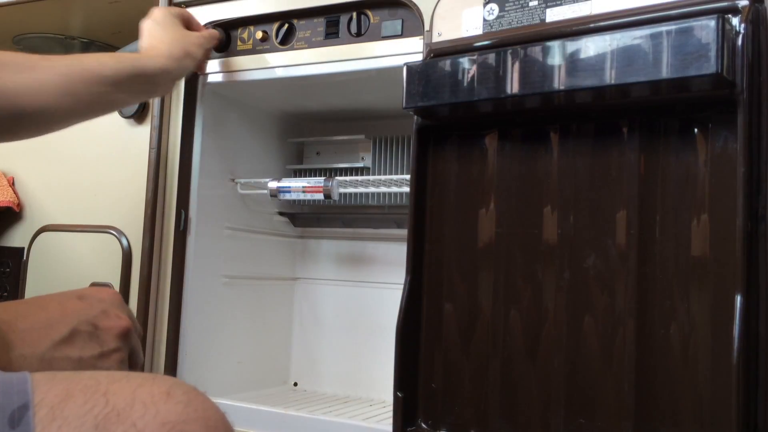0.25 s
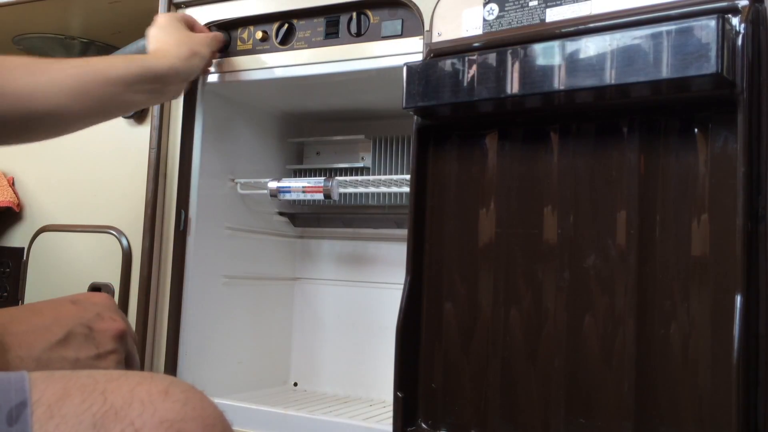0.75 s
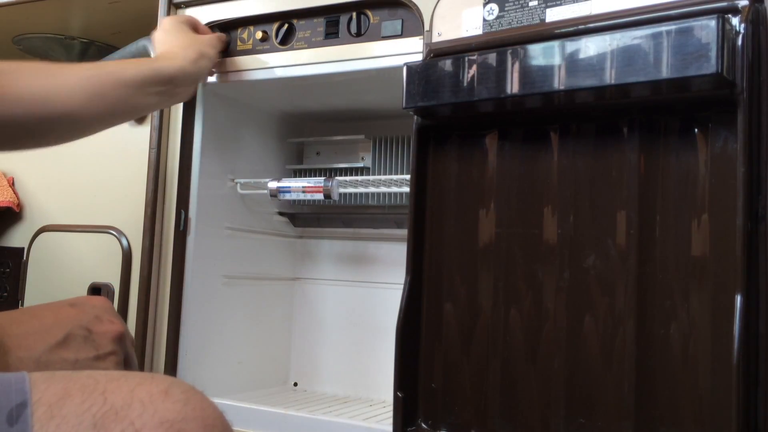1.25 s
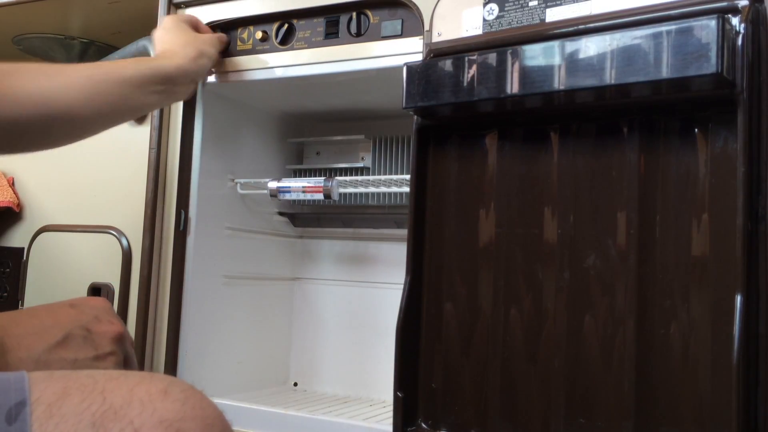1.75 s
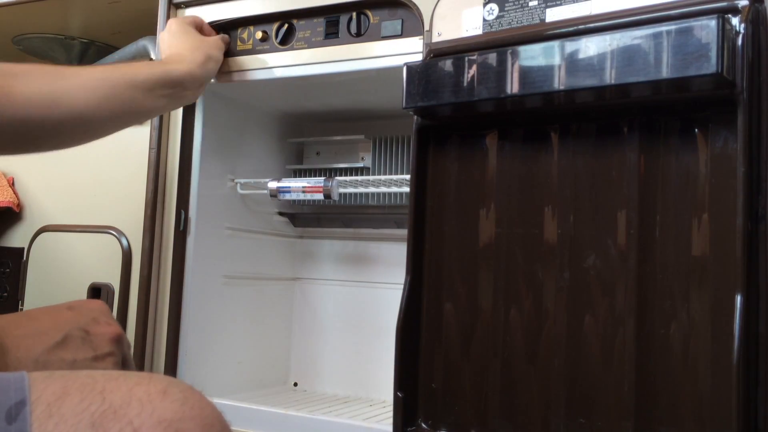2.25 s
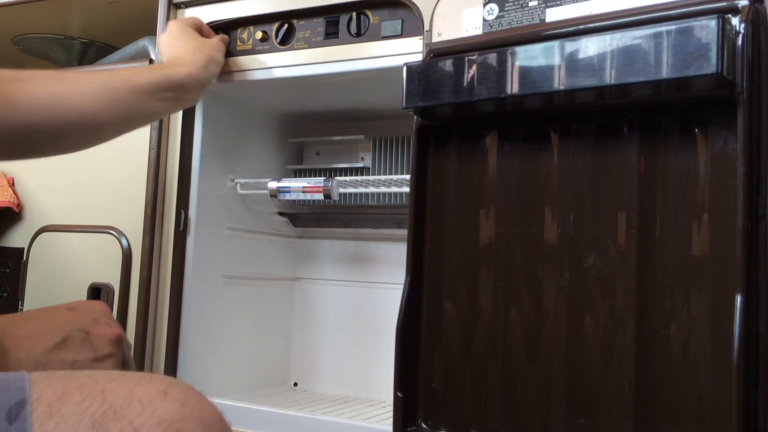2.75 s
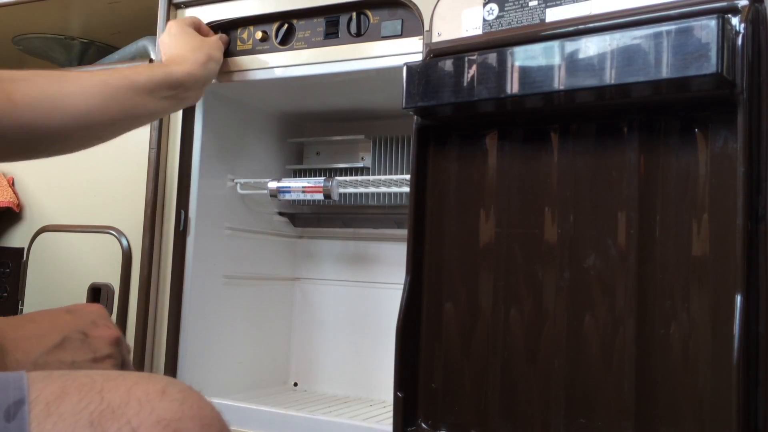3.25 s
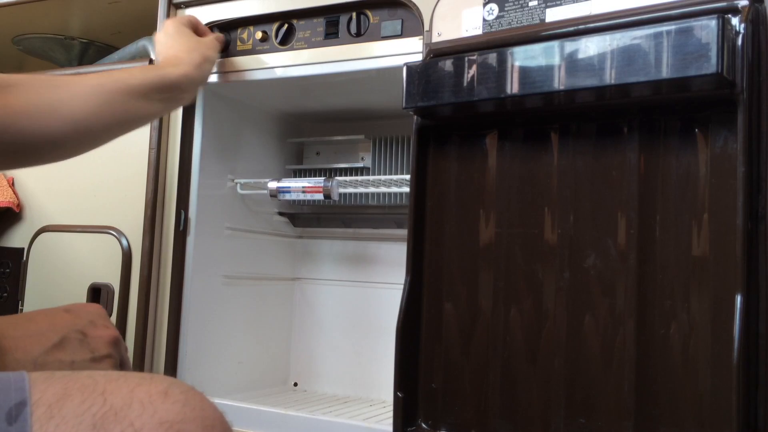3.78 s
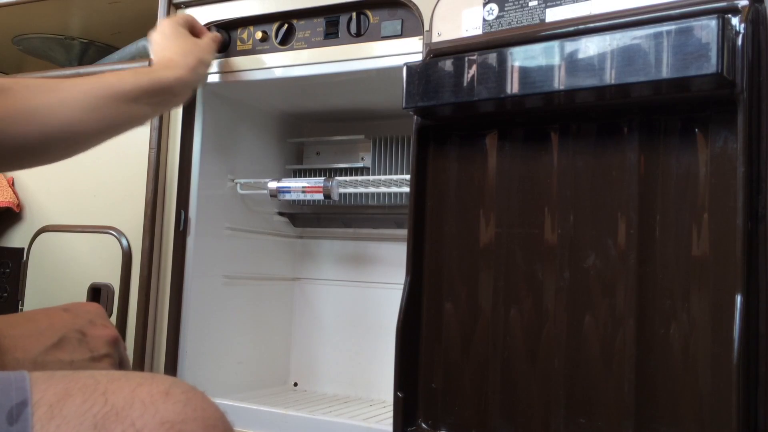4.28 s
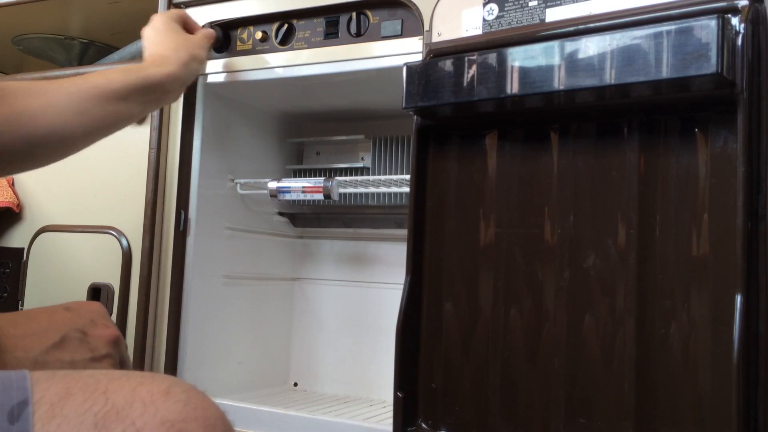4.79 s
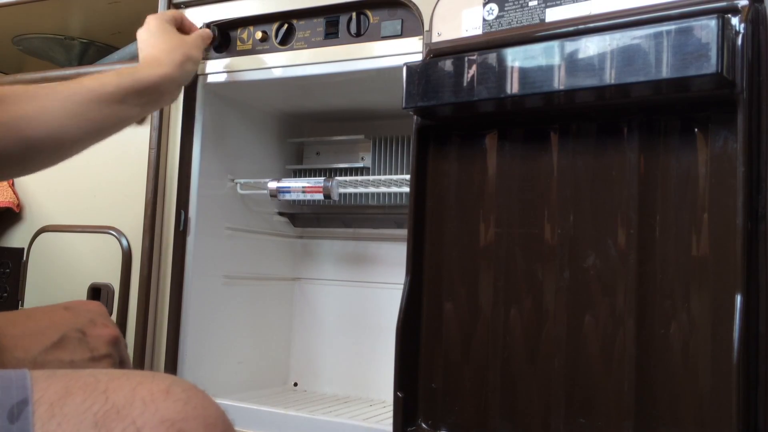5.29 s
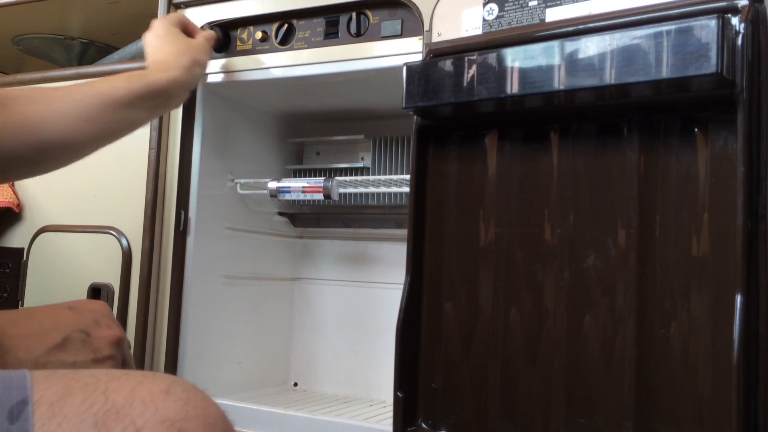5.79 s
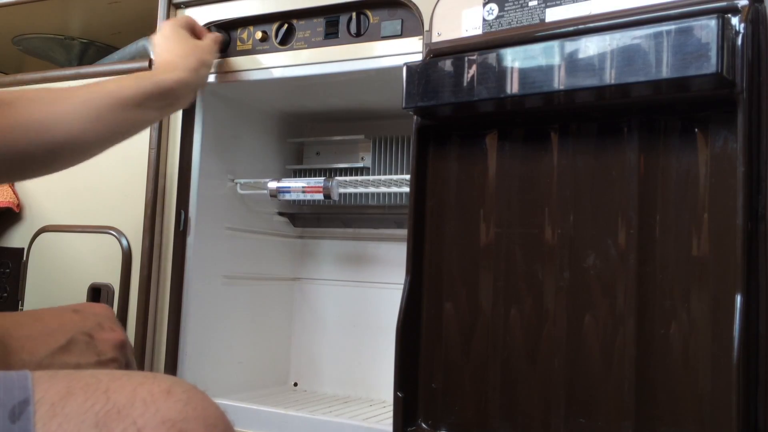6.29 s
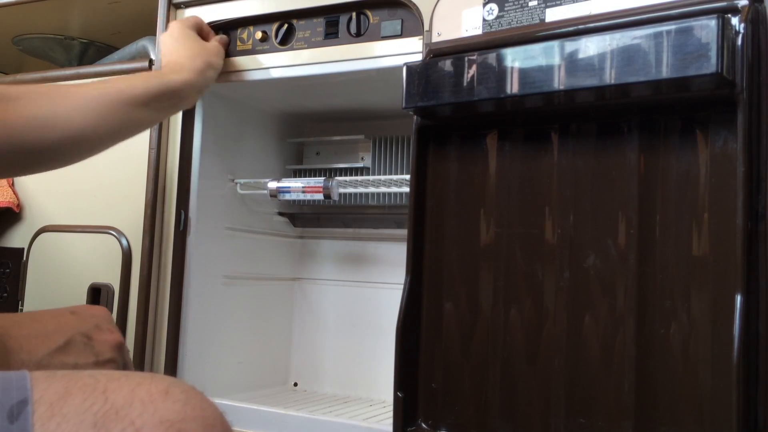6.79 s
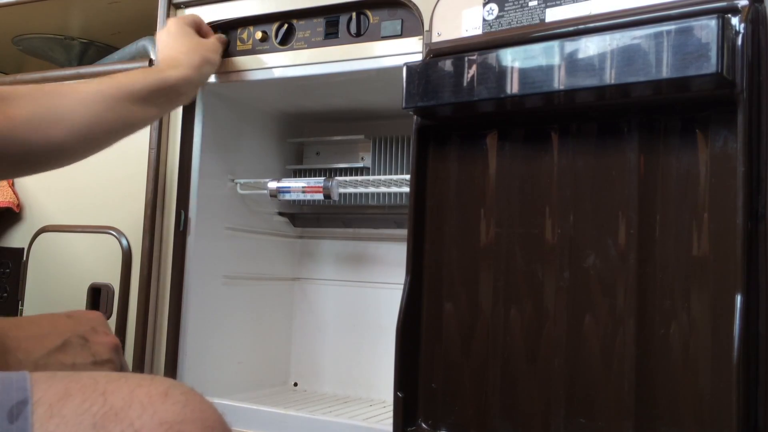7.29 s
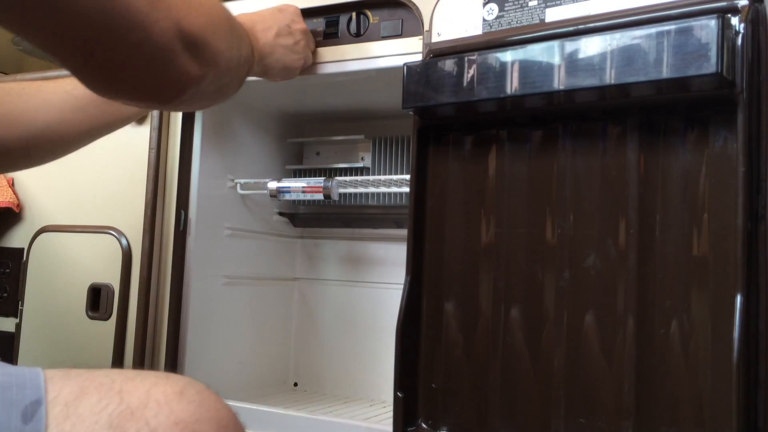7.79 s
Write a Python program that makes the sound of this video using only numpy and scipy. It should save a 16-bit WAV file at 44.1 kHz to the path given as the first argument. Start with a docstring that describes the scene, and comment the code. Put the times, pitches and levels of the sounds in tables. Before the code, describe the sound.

A close, dry perspective in a small camper van, beside an open, empty gas fridge. A quiet low rumble runs throughout, and a short hum swells and dies in the first half second while a half-hearted button press groans softly. From about 0.4 s the piezo igniter is pushed firmly about four times a second, slightly unevenly, until about 7.6 s. Each cycle is a short rising squeak of sliding plastic, a tiny catch click, a loud sharp snap with a hollow, boxy cabinet boom, then a weaker rattling clatter under a tenth of a second later. The squeaks are fainter in the first and last pushes. Small stop taps fall between some snaps; a hard, bright clack rings at 2.9 s, and dull hand knocks come near 3.3, 5.9, 6.2 and 6.6 s. After the last snap, only light finger clicks around 7.8-8 s remain over the faint rumble.

```python
"""From the start a low rumble fills a camper van, and a short hum swells and dies: shaped noise and sines. The
button of the gas fridge's piezo igniter taps its stop at times: noise washes plus damped modes. A first half-
hearted push groans; then, about four times a second with the valve held in, each push squeals by sliding
friction, the catch trips, the hammer snaps, the cabinet booms and the button rattles back. At times the button
knocks dull as it bottoms out just before a snap. Clicks and creaks sound on the control panel, and one hard
clack rings there, as decaying modes."""
import sys
import numpy as np
from scipy import signal
from scipy.fft import rfft, irfft, next_fast_len
from scipy.io import wavfile
from scipy.ndimage import uniform_filter1d, minimum_filter1d, map_coordinates

SR = 44100
rng = np.random.default_rng(int(sys.argv[2]) if len(sys.argv) > 2 else 0)


def wav_out(sig):
    """Save sig, one row per channel (or a flat mono array), as 16-bit PCM at SR to the path in sys.argv[1]."""
    wavfile.write(sys.argv[1], SR, np.round(np.clip(np.atleast_2d(sig).T, -1, 1) * 32767).astype(np.int16))


N = 354475
TIME = np.arange(N) / SR
RING = np.arange(SR // 4) / SR  # time since a blow (s)


def amp(db):
    """Logarithmic level: 20 dB is a factor of ten in amplitude."""
    return 10 ** (np.asarray(db) / 20)


def unit(x):
    """Root-mean-square normalisation: scale to rms 1."""
    return x / np.sqrt(np.mean(x ** 2) + 1e-20)


def along(hz, points_hz, values):
    """Log-frequency interpolation: straight lines between points on a logarithmic axis."""
    return np.interp(np.log(hz + 1), np.log(points_hz), values)


def wobble(rate, size):
    """Slow random modulation: a smooth curve through random knots, rate of them a second."""
    knots = rng.standard_normal(int(size * rate / SR) + 4)
    return map_coordinates(knots, [np.arange(size) * rate / SR])


def filtered(x, gain):
    """Linear filtering: multiply the spectrum by a gain that depends on frequency."""
    m = next_fast_len(len(x) + 2048)
    spectrum = rfft(x, m) * gain(np.fft.rfftfreq(m, 1 / SR))
    return irfft(spectrum, m)[..., :len(x)]


def add(track, s, sound):
    """Superposition: mix a sound into the track at s seconds."""
    start = max(round(s * SR), 0)
    track[start:start + len(sound)] += sound[:max(len(track) - start, 0)]


# modes of the fridge cabinet, excited by every blow: f/Hz, level/dB relative to the blow's colour, t60/s
CABINET_MODES = [(150.4, -21, 0.31), (268.3, -14, 0.17), (300.8, -10.5, 0.14), (326.3, -19, 0.21),
                 (461, -11, 0.12), (526.7, -11, 0.084), (630, -21.5, 0.18), (707, -18, 0.17),
                 (906, -13.5, 0.11), (1327, -18, 0.085), (1603, -16, 0.12), (2040, -18.5, 0.14),
                 (2574, -15.5, 0.1), (2699, -6, 0.045), (3454, -12.5, 0.079)]


def blows(events, colour, own_modes, modes_db, swell_cycles, ragged_db, alike, attack=0.00079):
    """Impact excitation: a diffuse wash plus damped modes; events give t/s, crack level/dB, thud level/dB."""
    band_hz, band_db, band_t60 = np.transpose(colour)
    mode_hz, mode_db, mode_t60 = np.transpose(CABINET_MODES + own_modes)
    hz, t60 = np.r_[band_hz, mode_hz], np.r_[band_t60, mode_t60]
    db = np.r_[band_db, modes_db + mode_db + along(mode_hz, band_hz, band_db)]

    # the cabinet takes a few cycles to get moving, so the bass blooms after the crack
    swell = 1 - np.exp(-(RING * hz[:, None] / swell_cycles) ** 2)
    onset = 1 - np.exp(-RING / attack)
    decay = np.exp(-np.log(1000) * RING / t60[:, None])
    shape = swell * onset * amp(db[:, None]) * decay

    def bands(f):
        """Filter bank: overlapping triangles on a log axis, rolled off below 60 Hz."""
        triangles = [along(f, band_hz, row) for row in np.eye(len(band_hz))]
        return np.array(triangles) * f ** 2 / (f ** 2 + 60 ** 2)

    # every blow takes the same paths through the van, so the share "alike" of the wash power repeats
    paths = rng.standard_normal(len(RING))
    phase = rng.uniform(0, 2 * np.pi, (len(mode_hz), 1))
    track = np.zeros(N)
    for s, crack_db, thud_db in events:
        fresh = rng.standard_normal(len(RING))
        wash = filtered(np.sqrt(alike) * paths + np.sqrt(1 - alike) * fresh, bands)
        wash = wash * amp(ragged_db * wobble(352, len(RING)))  # reflections arrive in clumps
        # loose parts shift a little at each blow and chatter, which roughens the high modes
        detune = 1 + .006 * rng.standard_normal(len(mode_hz))
        chatter = 1.8e-5 * wobble(450, len(RING))  # s
        ring = np.sin(2 * np.pi * (mode_hz * detune)[:, None] * (RING + chatter) + phase)
        # the thud level rules below 800 Hz, the crack level above 1700 Hz
        force_db = along(hz, [800, 1700], [thud_db, crack_db]) + rng.normal(0, 1.67, len(hz))
        add(track, s, amp(force_db) @ (shape * np.vstack([wash, ring])))
    return track


# course of the low hum: t/s, f/Hz, level/dB before its trim
HUM_COURSE = [(0, 111.6, -33.5), (.08, 105, -51.5), (.24, 112, -46), (.31, 117, -39.5), (.39, 115.3, -41),
              (.48, 116, -55)]
# spectral shape of the steady background: f/Hz, level/dB per Hz before normalisation
FLOOR_SPECTRUM = [(15, -50), (25, 7), (101, 8), (204, 0.5), (289, 9), (378, -9.5), (457, 0), (804, -6),
                  (1570, -12.5), (2230, -23.5), (2700, -16.5), (4260, -28), (5140, -35.5), (15500, -47.5)]
RUMBLE_DB, RUMBLE_FALL_DB_PER_S = -48.5, 0.52  # starting level; the rumble slowly settles


def van():
    """Filtered noise and tones: low rumble and a faint broad floor; a hum swells and dies at the start."""
    floor = filtered(rng.standard_normal(N), lambda f: amp(along(f, *np.transpose(FLOOR_SPECTRUM))))
    floor_db = -56.0 + 3.5 * wobble(5.1, N)

    rumble_hz = [35, 75, 105, 128, 152, 200, 400]
    rumble_shape_db = [-11.5, -4, 3.5, -6, -3.5, -27.5, -45.5]
    rumble = filtered(rng.standard_normal(N), lambda f: amp(along(f, rumble_hz, rumble_shape_db)))
    rumble_db = RUMBLE_DB - RUMBLE_FALL_DB_PER_S * TIME + 2.0 * wobble(4.5, N)

    s, hz, db = np.transpose(HUM_COURSE)
    low_phase = 2 * np.pi * np.cumsum(np.interp(TIME, s, hz)) / SR
    low = np.sin(low_phase) * amp(np.interp(TIME, s, db))
    high = np.sin(2 * np.pi * 186 * TIME + 0.59 * wobble(13.0, N))
    high = high * amp(np.interp(TIME, [0, .25, .48], [-48, -51, -66]))
    hum = amp(2.0) * (low + high) * (TIME < s[-1])
    return amp(floor_db) * unit(floor) + amp(rumble_db) * unit(rumble) + hum


# pushes of the igniter button, shared by all its parts:
# snap t/s, strength level/dB before trims, squeal pitch approached f/Hz, delay until the button is back t/s
PUSHES = [(0.3971, -25.5, 5380, .069), (0.629, -21, 6000, 0.084), (0.8702, -20.5, 5550, 0.082),
          (1.108, -20, 6260, 0.093), (1.3584, -21.5, 6130, 0.088), (1.6053, -20.5, 6020, 0.092),
          (1.8541, -21, 6070, 0.085), (2.0926, -19, 6660, .093), (2.3359, -19, 6970, .092),
          (2.5873, -20.5, 6580, 0.096), (2.8424, -19.5, 6180, 0.1), (3.0815, -21, 5970, 0.094),
          (3.339, -23.5, 5650, 0.075), (3.5658, -21, 5700, 0.088), (3.8143, -21.5, 5800, .085),
          (4.0526, -23.5, 6000, 0.085), (4.2882, -19, 6990, 0.094), (4.5429, -21.5, 6000, 0.071),
          (4.7669, -20, 6610, 0.09), (5.007, -20, 5950, 0.085), (5.235, -21, 5820, .083),
          (5.4731, -21, 6600, 0.082), (5.701, -20, 6500, .09), (5.953, -23.5, 5680, 0.067),
          (6.1864, -23, 6050, 0.07), (6.413, -21, 6470, 0.08), (6.6567, -23, 6010, 0.072),
          (6.8799, -20, 6360, 0.086), (7.0993, -20, 6500, 0.1), (7.3466, -23, 5850, 0.079),
          (7.5502, -21.5, 5400, .098)]
# the button taps its outer stop: t/s, level/dB
STOP_TAPS = [(0.0014, -32), (0.2767, -35.5), (1.498, -31), (1.7526, -34.5), (2.245, -35.5), (2.4745, -25),
             (2.7401, -41), (3.2251, -25.5), (4.449, -34.5), (5.3728, -30), (5.849, -36), (6.0824, -43),
             (6.319, -33.5), (6.557, -38.5)]
# colour and decay of the button's return, then of a tap: f/Hz, level/dB per Hz, t60/s
RETURN_COLOUR = [(120, 15.5, 0.11), (321, 18.5, 0.044), (430, 9.5, 0.045), (1010, 4.5, .13),
                 (1480, 5.5, 0.054), (3080, 0, 0.071), (4200, -9, 0.092), (7200, -12.5, 0.063),
                 (14800, -5.5, 0.032)]
TAP_COLOUR = [(90, 22, 0.28), (272, 20.5, 0.16), (433, 10.5, 0.15), (1000, 10, 0.11), (2400, 2, 0.065),
              (4360, -19.5, 0.11), (6500, -5.5, 0.08), (10500, -14.5, 0.093), (15000, -42, .08)]
# modes of the spring: f/Hz, level/dB relative to the tap's colour, t60/s
SPRING_MODES = [(7050, -2, 0.07), (10190, -5, 0.06)]
RETURN_DB, RETURN_THUD_DB, RETURN_SCATTER_DB = -30.5, -5.5, .5  # level before trims, thud against it, spread
RETURN_FOLLOWS = 0.59  # dB of return per dB of push
TAP_THUD_DB = -4  # against the tap's crack


def button():
    """Repeated impact: the button rattles back in three contacts, harder after a hard push, or taps its stop."""
    alike = .25
    snap_s, push_db, _, back_s = np.transpose(PUSHES)
    s = snap_s + back_s
    db = RETURN_DB + RETURN_FOLLOWS * (push_db - push_db.mean())
    db = db + RETURN_SCATTER_DB * rng.standard_normal(len(s))
    thud_db = db + RETURN_THUD_DB
    gaps_s = rng.uniform([.007, .016], [.015, .025], (len(s), 2))
    release = zip(s, db + 0.5, thud_db - 7)
    landing = zip(s + gaps_s[:, 0], db - 5, thud_db - 3.0)
    bounce = zip(s + gaps_s[:, 1], db - 7, thud_db - 11)
    rattle = blows([*release, *landing, *bounce], RETURN_COLOUR, [], modes_db=-3.0,
                   swell_cycles=0.79, ragged_db=2.4, alike=alike, attack=0.0018)
    stops = [(s, db, db + TAP_THUD_DB) for s, db in STOP_TAPS]
    taps = blows(stops, TAP_COLOUR, SPRING_MODES, modes_db=-3.5,
                 swell_cycles=2.8, ragged_db=3, alike=alike)
    return amp(-2) * rattle + taps


def squeal(pitch_hz, whistle_db, groan_db):
    """Stick-slip friction: sliding plastic whistles unsteadily over a groan about five times lower, and rubs."""
    size = len(pitch_hz)
    phase = 2 * np.pi * np.cumsum(pitch_hz * (1 + .039 * wobble(1100, size))) / SR
    whistle = np.sin(phase) * amp(whistle_db + 3.5 * wobble(260, size))
    groan = np.sin(.21 * phase) * amp(groan_db)
    rub_hz, rub_db = [300, 1100, 2200, 6000, 14000], [-3.0, 13.0, -1.5, -6, -24]
    rub = unit(filtered(rng.standard_normal(size), lambda f: amp(along(f, rub_hz, rub_db))))
    return whistle + groan + amp(-5.5) * rub * amp(np.maximum(whistle_db, groan_db))


# the groan speaks first, then the whistle takes over and fades as the spring stiffens:
# t/s into the push, whistle level/dB against its peak, groan level/dB
SQUEAL_STAGES = [(0, -36, -74), (.016, -24, -60), (.026, -12, -48), (.037, -.5, -57), (.052, 0, -60),
                 (.075, -6, -54)]
# the first and last pushes whistle less: t/s, level/dB against SQUEAL_DB
SQUEAL_FADE = [(.3, -9.5), (.9, -6), (1.3, -1.5), (6.6, -0.5), (7.5, -13)]
SQUEAL_DB, SQUEAL_SCATTER_DB = -50, 1  # whistle level before the fade, and its spread
STROKE_CYCLES = 435  # stroke time times final pitch: a faster push squeals higher and for a shorter time
SPEED_UP_S = .018  # time constant of the plunger's speed


def plunger():
    """Speed-dependent friction: each push speeds up, so its squeal rises and levels off until the snap."""
    track = np.zeros(N)
    # a first half-hearted push groans up and down again without firing
    push = np.sin(np.linspace(.3, np.pi - .3, round(.14 * SR)))
    add(track, .04, push * squeal(5600 * push ** 1.1, whistle_db=-72, groan_db=-53.5))

    stage_s, stage_whistle_db, stage_groan_db = np.transpose(SQUEAL_STAGES)
    for snap_s, _, top_hz, _ in PUSHES:
        stroke_s = STROKE_CYCLES / top_hz
        t = np.arange(round(stroke_s * SR)) / SR
        speed = 1 - np.exp(-t / SPEED_UP_S)
        peak_db = SQUEAL_DB + np.interp(snap_s, *np.transpose(SQUEAL_FADE))
        peak_db = peak_db + SQUEAL_SCATTER_DB * rng.standard_normal()
        whistle_db = peak_db + np.interp(t, stage_s, stage_whistle_db)
        groan_db = np.interp(t, stage_s, stage_groan_db)
        add(track, snap_s - stroke_s, squeal(top_hz * speed, whistle_db, groan_db))
    return track


# light clicks of fingers on the controls before and after the pushes: t/s, level/dB before the trim
FINGER_CLICKS = [(0.1975, -39), (7.802, -45), (7.8437, -33), (7.889, -46.5), (7.9984, -44)]
# dull knocks as the button bottoms out just before some snaps: t/s, level/dB before the trim
BOTTOMING_KNOCKS = [(3.3236, -23.5), (5.9464, -35), (6.1743, -31), (6.6456, -31)]
# the hard clack: t/s, crack level/dB, thud level/dB, both before the trim
HARD_CLACK = [(2.8798, -9, -18)]
# colour and decay of clicks, ticks, knocks and the clack: f/Hz, level/dB per Hz, t60/s
CLICK_COLOUR = [(500, 1.5, 0.067), (1400, 9, 0.068), (3500, -2.5, 0.045), (6500, 2, 0.036), (9000, -7, .04),
                (15000, -9, .04)]
TICK_COLOUR = [(1000, -2, 0.08), (4000, -6, 0.08), (5400, -1, 0.045), (6900, 4, .05), (8880, -4, 0.05),
               (15000, -7, 0.045)]
KNOCK_COLOUR = [(130, 4, 0.082), (500, 20, 0.15), (1390, 10.5, 0.081), (2970, -13, 0.11),
                (11700, -18, 0.092)]
CLACK_COLOUR = [(110, -4, 0.18), (257, 16.5, 0.27), (600, 12.5, 0.27), (1186, 7, 0.14), (2130, -1.5, 0.096),
                (3080, 6.5, 0.11), (4700, -2.5, .1), (8080, -4, 0.095), (15000, -10, 0.065)]
# modes of the control panel: f/Hz, level/dB relative to the clack's colour, t60/s
PANEL_MODES = [(1714, -10, 0.11), (2930, -9.5, 0.086), (2780, -8.5, 0.043), (3070, -7, 0.058),
               (3222, -48.5, 0.17), (3550, -9, 0.11), (4120, -14, .1)]
KNOCK_THUD_DB = -3.5  # against the knock's crack


def panel():
    """Plate excitation: the button knocks as it bottoms out before some snaps; fingers click and the knob
    creaks on the control panel; one hard clack rings it."""
    touches = [(s, db, db) for s, db in FINGER_CLICKS]
    clicks = blows(touches, CLICK_COLOUR, [], modes_db=-11, swell_cycles=3.1, ragged_db=1.5, alike=0)
    bumps = [(s, db, db + KNOCK_THUD_DB) for s, db in BOTTOMING_KNOCKS]
    knocks = blows(bumps, KNOCK_COLOUR, [], modes_db=-8.5, swell_cycles=1.8, ragged_db=0.5, alike=0)
    clack = blows(HARD_CLACK, CLACK_COLOUR, PANEL_MODES, modes_db=-0.5,
                  swell_cycles=0.45, ragged_db=2.5, alike=0)
    # faint creaks of the held knob fall at random
    creak_rows = [(s, db, db) for s, db in rng.uniform([0, -7], [N / SR, 0], size=(40, 2))]
    creaks = blows(creak_rows, TICK_COLOUR, [], modes_db=9, swell_cycles=2, ragged_db=5, alike=0)
    return amp(-8.5) * clicks + amp(-6.0) * knocks + amp(-6) * clack + amp(-53.0) * creaks


# colour and decay of the snap: f/Hz, level/dB per Hz, t60/s
SNAP_COLOUR = [(127, 10, 0.092), (253, 16.5, 0.31), (366, 7.5, 0.27), (610, 14.5, 0.23), (885, 10, 0.16),
               (1562, 4, 0.12), (2200, -7.5, 0.12), (3060, -1, 0.095), (4640, -7, 0.11), (6160, 4, 0.04),
               (7760, 0.5, 0.057), (9150, -15.5, 0.095), (15000, -15, 0.078)]
# modes of the hammer: f/Hz, level/dB relative to the snap's colour, t60/s
HAMMER_MODES = [(4160, -14, 0.14), (4010, -13.5, 0.11), (5330, -19.5, 0.11), (6000, -16, 0.082),
                (6380, -18, 0.076), (7320, -21, 0.11)]
TRIP_LEAD_S, TRIP_SCATTER_S = 0.012, .002  # the catch trips just before the hammer lands
TRIP_DB, TRIP_SCATTER_DB = -45.5, 2.5
SNAP_THUD_DB = -11  # the cabinet's thud under the crack of a snap
LATCH_SHARE = .72  # the latch resets at this share of the return time
LATCH_DB, LATCH_SCATTER_DB = -41, 3  # level before the trim, and its spread


def hammer():
    """Stored-energy impact: the catch trips, the hammer snaps on the crystal, the latch ticks as it resets."""
    alike = .4
    snap_s, push_db, _, back_s = np.transpose(PUSHES)
    chance = rng.standard_normal((len(PUSHES), 3))
    trip_db = TRIP_DB + TRIP_SCATTER_DB * chance[:, 0]
    trip_s = snap_s - TRIP_LEAD_S + TRIP_SCATTER_S * chance[:, 1]
    trips = blows(zip(trip_s, trip_db, trip_db), CLICK_COLOUR, [], modes_db=-7,
                  swell_cycles=2, ragged_db=1.5, alike=alike)
    strikes = zip(snap_s, push_db, push_db + SNAP_THUD_DB)
    snaps = blows(strikes, SNAP_COLOUR, HAMMER_MODES, modes_db=-1,
                  swell_cycles=3.52, ragged_db=2.4, alike=alike, attack=0.0015)
    latch_db = LATCH_DB + LATCH_SCATTER_DB * chance[:, 2]
    resets = zip(snap_s + LATCH_SHARE * back_s, latch_db, latch_db)
    ticks = blows(resets, TICK_COLOUR, [], modes_db=-11, swell_cycles=8.1, ragged_db=0, alike=alike)
    return trips + amp(-1.5) * snaps + amp(-5.5) * ticks


def hollow():
    """Cavity resonance: after each snap the open cabinet fills with a note that bends upward and drops away."""
    track = np.zeros(N)
    build_s = [0, .008, .016, .035, .046, .1, .25]
    build = amp(np.interp(RING, build_s, [-47, -7.5, -3, -5.0, -21.5, -45, -100]))
    for snap_s, push_db, _, _ in PUSHES:
        hz = np.interp(RING, [.01, .04], [605, 665]) * (1 + 0.0087 * rng.standard_normal())
        note = build * np.sin(2 * np.pi * np.cumsum(hz) / SR)
        add(track, snap_s, amp(push_db - 11.0 + rng.normal(0, 1.2)) * note)
    return track


def scene():
    """Superposition: everything heard from the seat in front of the open fridge."""
    return (van() + button() + plunger() + panel() + hammer() + hollow())[None]


DUCK_ABOVE_DB, DUCK_SHARE = -23, 0.59  # threshold, and dB of dip per dB above it
DUCK_HOLD_S, DUCK_GLIDE_S = .17, 0.08  # how long a dip is held, and its smoothing time constant
TOP_HZ = 15600  # steep upper band limit


def record(dry):
    """Dynamic compression and low-pass: the level dips after a loud blow, and the top of the band is cut."""
    power = uniform_filter1d(dry[0] ** 2, size=220)  # 5 ms mean
    level_db = 10 * np.log10(np.abs(power) + 1e-12)
    hold = int(DUCK_HOLD_S * SR)
    # the padding delays the centred window, so a dip only follows its blow
    wanted_db = np.pad(DUCK_SHARE * np.minimum(DUCK_ABOVE_DB - level_db, 0), (hold // 2, 0))
    held_db = minimum_filter1d(wanted_db, hold)[:N]
    keep = np.exp(-1 / (DUCK_GLIDE_S * SR))
    gain_db = signal.lfilter([1 - keep], [1, -keep], held_db)
    return filtered(dry[0] * amp(gain_db), lambda f: 1 / (1 + (f / TOP_HZ) ** 120))[None]


dry = scene()
out = record(dry)
wav_out(out)
```